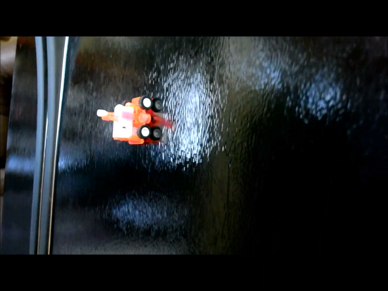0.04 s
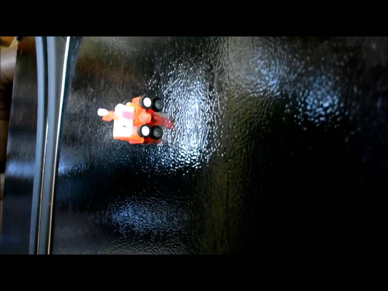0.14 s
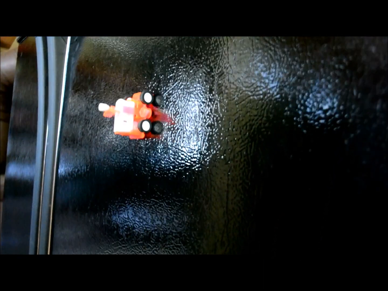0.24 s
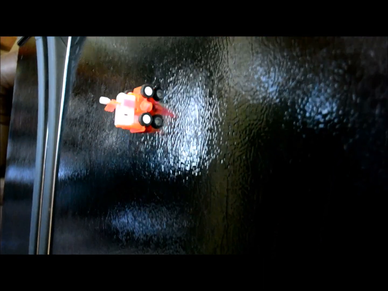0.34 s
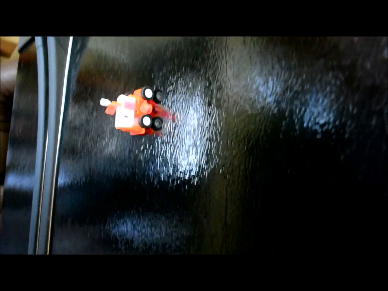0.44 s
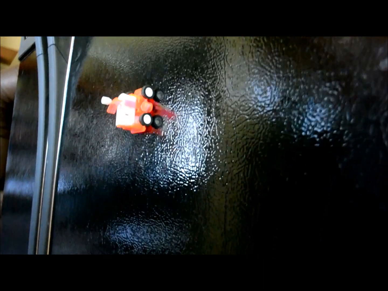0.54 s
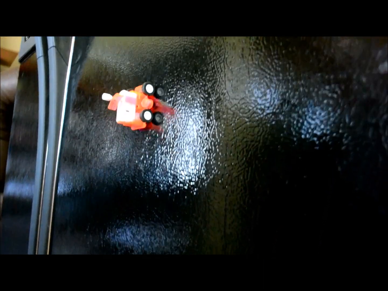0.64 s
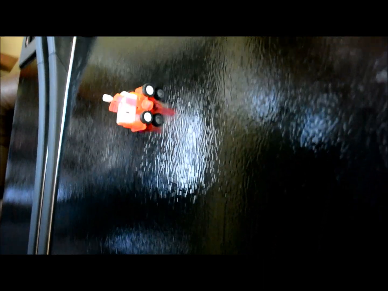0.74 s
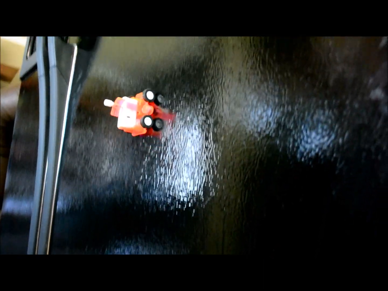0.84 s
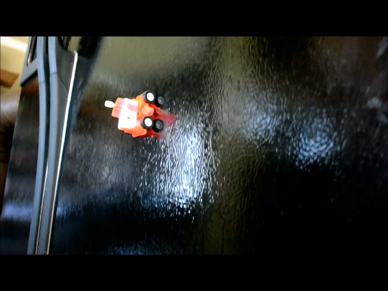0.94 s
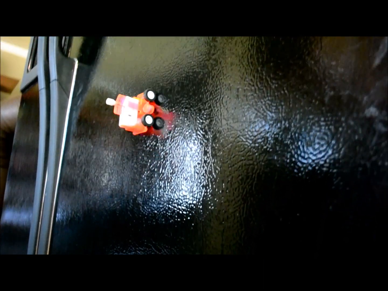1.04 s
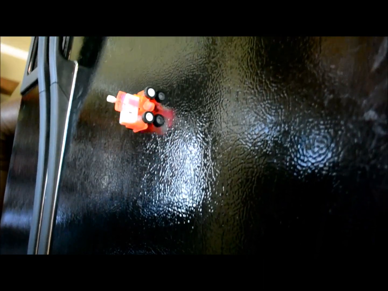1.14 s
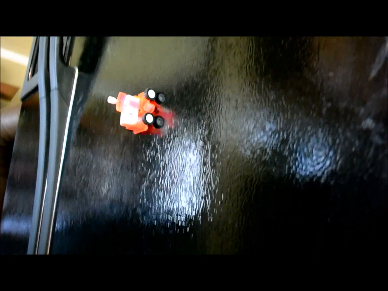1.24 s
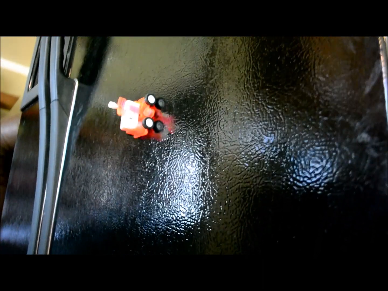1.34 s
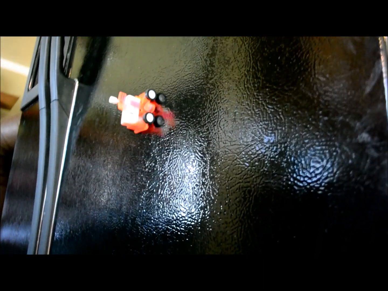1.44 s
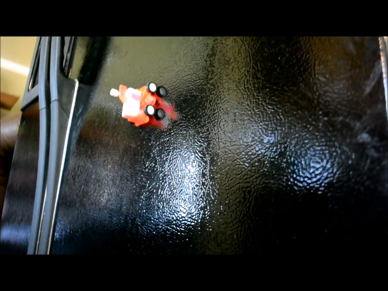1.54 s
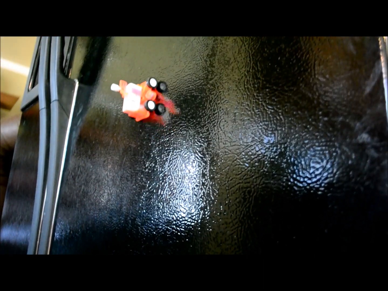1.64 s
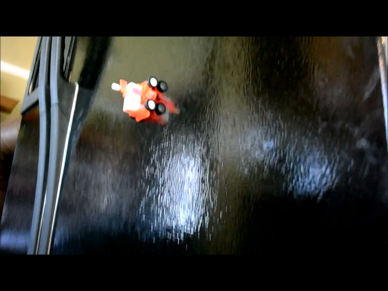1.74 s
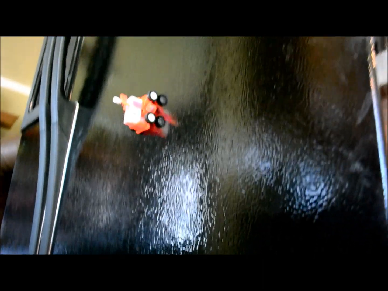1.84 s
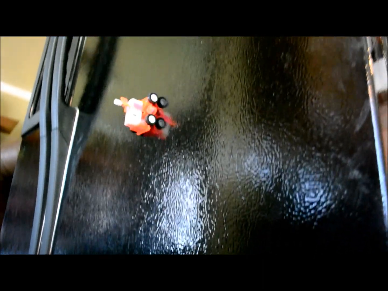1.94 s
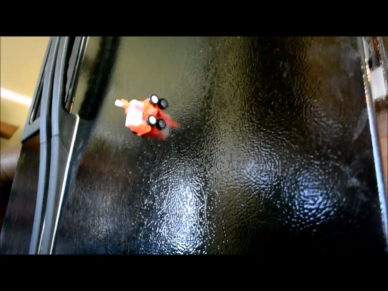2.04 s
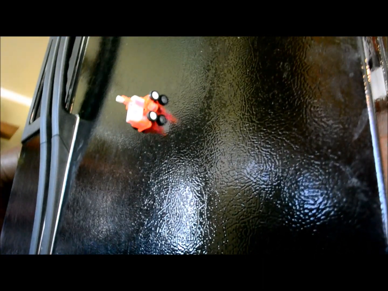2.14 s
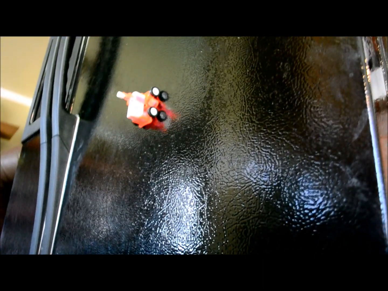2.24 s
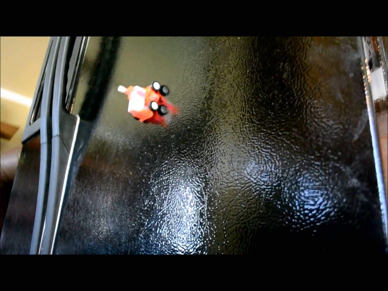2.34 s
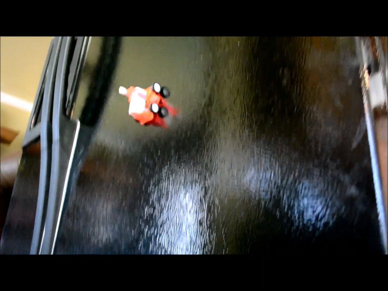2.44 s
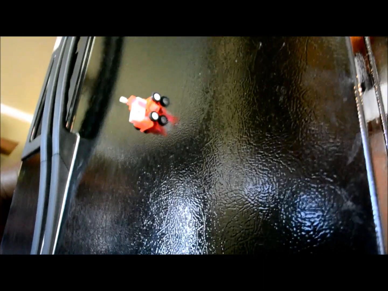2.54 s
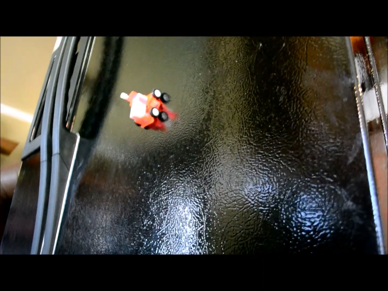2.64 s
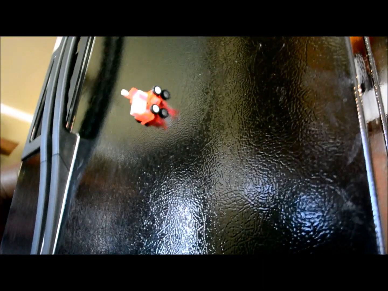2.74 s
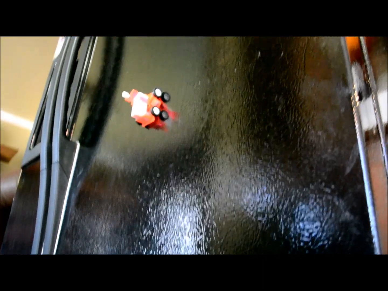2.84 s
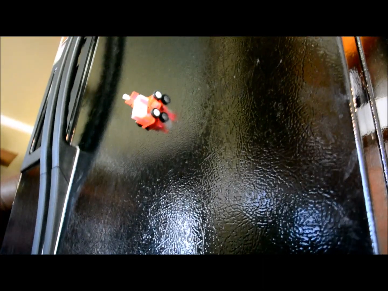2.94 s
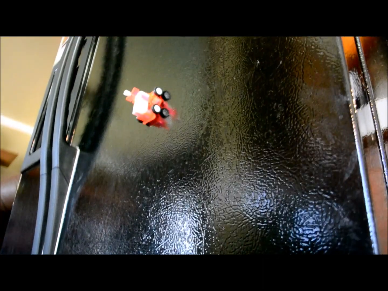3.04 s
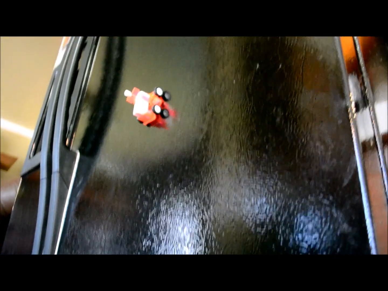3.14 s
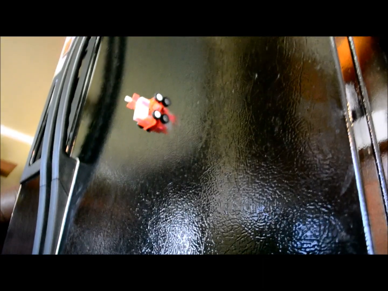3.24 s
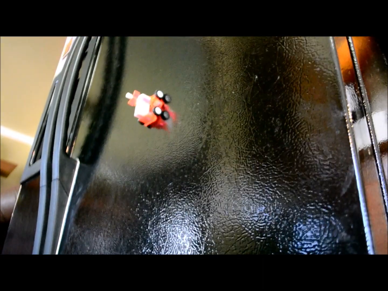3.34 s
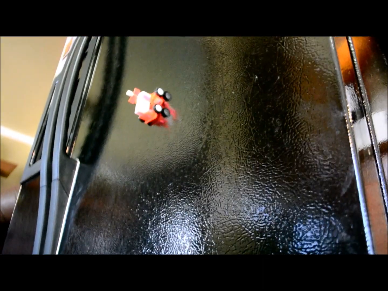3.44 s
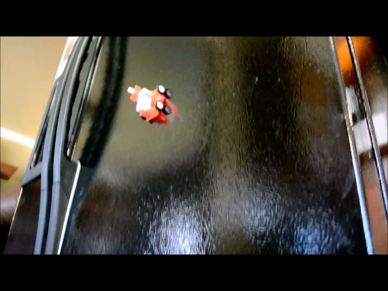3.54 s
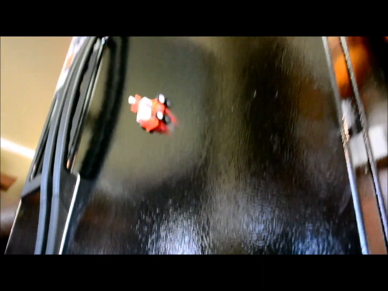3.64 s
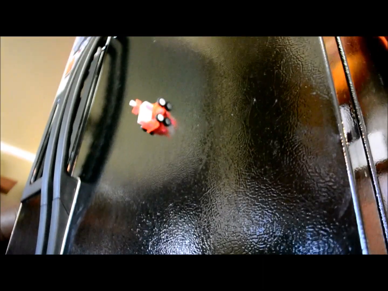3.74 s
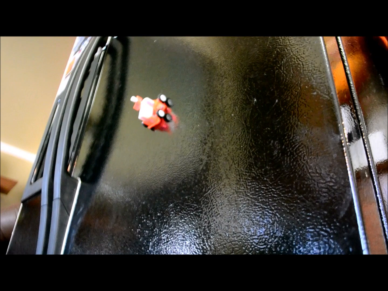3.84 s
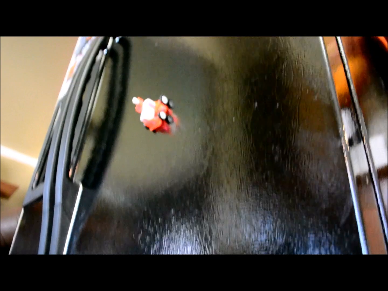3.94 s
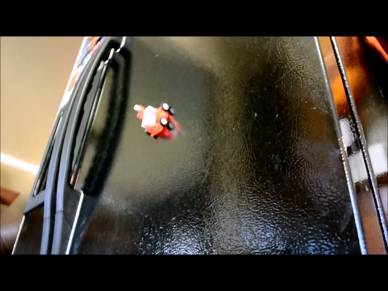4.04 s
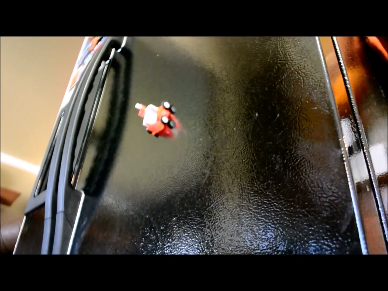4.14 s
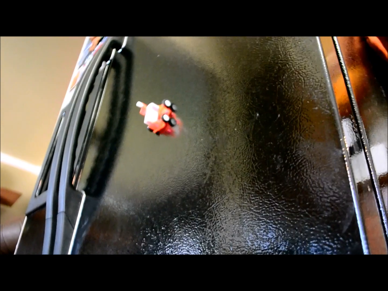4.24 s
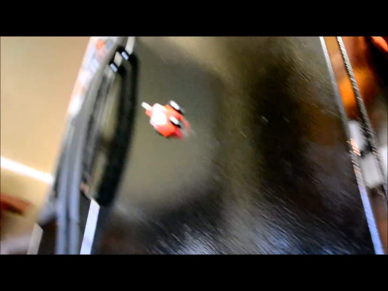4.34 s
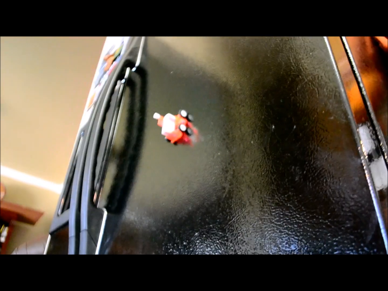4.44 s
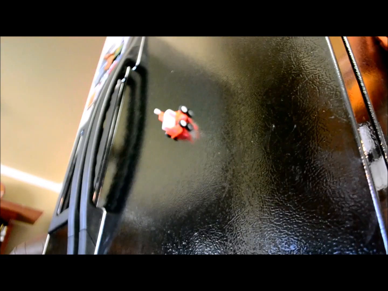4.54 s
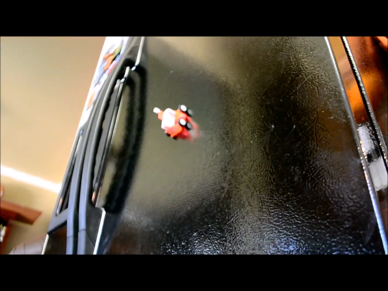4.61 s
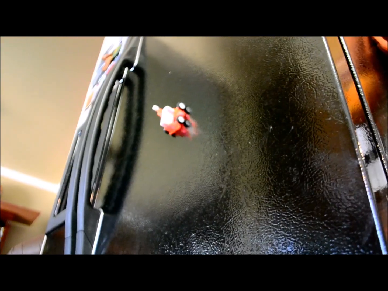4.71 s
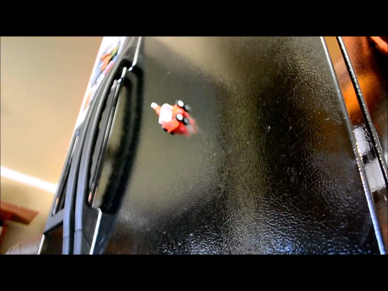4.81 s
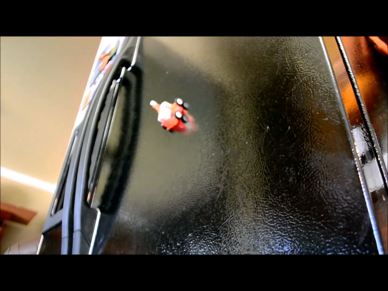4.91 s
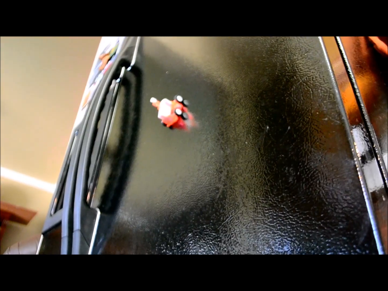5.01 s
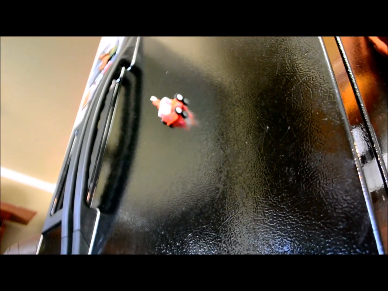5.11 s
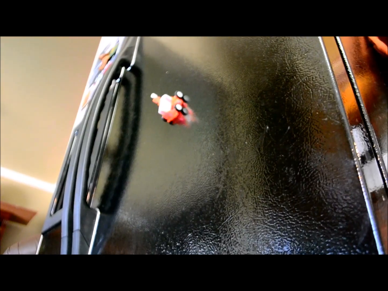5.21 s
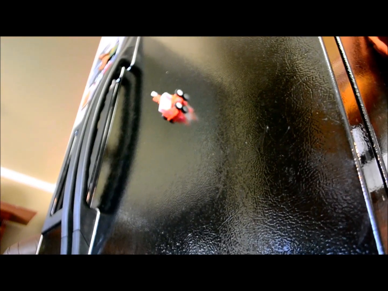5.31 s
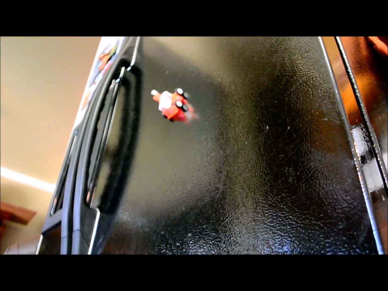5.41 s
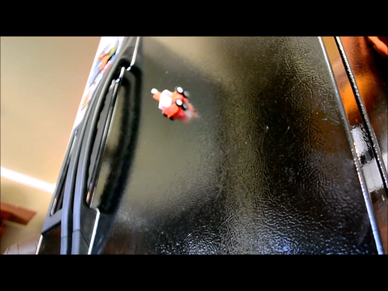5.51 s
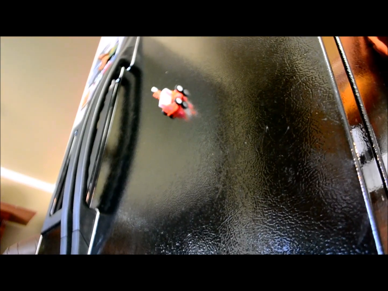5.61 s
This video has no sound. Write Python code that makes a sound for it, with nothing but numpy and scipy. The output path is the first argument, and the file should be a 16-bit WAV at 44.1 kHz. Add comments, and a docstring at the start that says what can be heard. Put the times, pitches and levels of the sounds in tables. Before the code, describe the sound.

Heard up close in a kitchen, a clockwork toy whirs with a high, plastic buzz of rapid ticks as it crawls up a metal fridge door. It starts steady, then drags briefly here and there, clicking as gear teeth catch and lightly tapping the door. The microphone takes a few soft, low bumps. As the spring unwinds, the buzz slows, weakens and stutters, still going over a faint fridge hum and hiss.

```python
"""A plastic wind-up toy climbs a steel fridge door, away from the microphone, as the fridge hums.
At first its spring drives about 110 tick-tocks a second, which ring the plastic shell and the door,
while gears rasp and loose parts rattle. From half a second on, the gears snag now and then.
Soon the toy gives its first knocks on the door, and the microphone is bumped a few times.
After four seconds the spring is running down: the ticks end slower, softer and more uneven."""
import sys
import numpy as np
from scipy import signal
from scipy.fft import rfft, irfft
from scipy.io import wavfile

SR = 44100
rng = np.random.default_rng(int(sys.argv[2]) if len(sys.argv) > 2 else 0)


def unload_audio(sound):
    """Save the sound as a 16-bit wav file, at the path given as the first command line argument."""
    columns = np.transpose(np.atleast_2d(sound))
    # keep every value between -1 and 1, then stretch to whole-number steps
    steps = np.round(np.clip(columns, -1, 1) * 32767)
    wavfile.write(sys.argv[1], SR, steps.astype(np.int16))


N = 250047
TIME = np.arange(N) / SR
FREQ = np.fft.rfftfreq(8192, 1 / SR)

# The pace of the unwinding spring, before snags: time_s, beat_rate_hz, relative_level_db
SPRING_PACE = [(0.0, 109.9, -22.5), (.25, 111.5, -21.5), (.35, 110.5, -22.5), (.41, 109.8, -22),
               (.46, 110, -22.5), (.55, 108.4, -22.8), (1.05, 110.3, -21), (1.7, 99.14, -21.5),
               (2.85, 97, -22.5), (3.65, 89.8, -23), (4.0, 75.7, -27), (4.55, 76.2, -27),
               (4.92, 75.46, -28), (5.03, 68.5, -28.5), (5.67, 62.4, -31)]
# Moments when the gears drag: start_s, length_s, slower_by_hz, softer_by_db
GEAR_SNAGS = [(0.561, 0.33, 9.6, -0.3), (1.262, .31, 15, 0.5), (2.047, 0.088, 11.6, 2.8),
              (2.366, 0.36, 8.2, 1.1), (3.042, 0.43, 13.7, 2.8), (3.447, 0.057, 3.13, 4),
              (3.808, 0.057, 4.2, 1.5), (4.066, .125, 9.1, 7), (4.14, .04, 2, 5), (4.243, 0.046, 5.4, 11),
              (4.538, 0.045, 2.74, 6), (4.675, 0.031, 3.5, 4), (5.05, 0.087, 2.77, 11),
              (5.418, 0.15, 3, 10), (5.435, .035, 2, 10)]
# Teeth that catch hard: time_s, relative_level_db
HARD_CATCHES = [(1.7979, -15), (2.3604, -21.5), (2.4202, -19), (2.5474, -20.5), (2.6853, -20),
                (2.696, -19.5), (2.765, -19.5), (2.7904, -19), (2.8195, -19.5), (2.8503, -20),
                (2.9549, -20.5), (3.021, -22.5), (3.0686, -22.5), (3.098, -22), (3.138, -22.5),
                (3.1833, -23), (3.2345, -21.5), (3.3325, -23), (3.4263, -22), (3.5211, -22.5),
                (3.5545, -21), (3.6004, -21), (3.6323, -20), (3.6426, -19.5), (3.757, -22), (3.7805, -21),
                (3.8049, -23), (3.8693, -24), (3.983, -23.5), (4.047, -22), (4.2203, -23), (4.291, -25.5),
                (4.32, -22), (4.4043, -21), (4.616, -23.5), (4.6538, -25), (4.7385, -25), (4.7497, -26),
                (4.7765, -27), (4.8166, -26), (4.8865, -24.5), (4.899, -26), (4.9236, -24.5),
                (4.9378, -27.5), (4.952, -25), (5.0965, -28.5), (5.1595, -26.5), (5.2025, -28.5),
                (5.2302, -20.5), (5.241, -27), (5.318, -28), (5.351, -27), (5.3814, -28.5), (5.3943, -29),
                (5.4074, -26), (5.526, -36), (5.58, -34), (5.6, -29), (5.6326, -26.5), (5.6487, -27)]
# Pitches at which the plastic shell rings: pitch_hz, width_hz, from_side_db, from_behind_db
SHELL_RESONANCES = [(2450, 530, -10, -49), (2916, 300, -4, -11), (3643, 745, -2, -6), (4133, 324, 4, -5),
                    (4480, 420, -1, -3), (4880, 450, -2, -14), (5490, 1100, 0, -7.5), (6020, 790, -10.5, 0),
                    (6740, 1000, -9, -6), (7550, 1170, -15.5, -5), (8390, 810, -8, -6),
                    (9390, 1520, -7.5, -9.5), (10370, 960, -6, -19.5)]
# Shell pitches that stand out for a while: start_s, end_s, from_hz, to_hz, width_hz, added_band_db
PASSING_RINGS = [(0.15, 0.5, 3550, 3600, 600, -3), (0.0, 0.55, 4290, 4150, 300, -8),
                 (0.5, 1.2, 4140, 4080, 240, -13), (0.33, 0.7, 5480, 5560, 500, -10),
                 (1.65, 2.9, 4230, 4280, 260, -3), (2.38, 3.1, 4530, 4500, 190, -1.5),
                 (1.6, 3.05, 6780, 6680, 380, -9), (2.75, 4.1, 3650, 3330, 480, -2),
                 (4.6, 5.45, 7420, 7380, 260, -4), (4.75, 5.45, 5600, 5550, 380, -7)]
# Pitches at which the steel door rings: pitch_hz, width_hz, from_side_db, from_behind_db
DOOR_RESONANCES = [(202.5, 46, 5, -34), (299.4, 36, 8, 3), (438, 74, -4, -2.5), (744, 710, -6, -13),
                   (997, 93, -7, 5.5), (1088, 83, -24, 5), (1325, 280, -6, 3), (1610, 710, 6, -3)]
# How the climbing toy faces the microphone: time_s, behind_share (0 = side on, 1 = from behind)
VIEWPOINT = [(0.0, 0.1), (2.9, 0.6), (4.1, 0.77), (5.67, 1.0)]
# The toy's knocks and rebounds on the door: start_s, level_db, pitch_hz, decay_s
DOOR_KNOCKS = [(0.9185, -39, 1240, .01), (0.921, -31.5, 1240, .016), (1.2738, -37, 1180, .024),
               (1.2787, -38, 1200, .016), (4.0765, -36, 1600, .007), (4.0765, -44, 410, .018),
               (4.3635, -33, 520, .007), (4.367, -41, 280, .016), (5.605, -35, 1400, .012),
               (5.614, -41, 1400, .012)]
# First echoes off the kitchen fittings: delay_s, starting_level_db
KITCHEN_ECHOES = [(.0027, -16), (.0062, 1)]
# Handling bumps on the microphone: start_s, level_db, pitch_hz, width_hz, decay_s
MICROPHONE_BUMPS = [(1.21, -71, 34.93, 39.82, 0.19), (1.62, -67, 88.7, 69.8, 0.16),
                    (1.92, -61, 110.6, 45.3, 0.25), (2.205, -56, 100.1, 51.1, 0.2),
                    (2.228, -47, 140.8, 113, 0.07), (3.195, -57.5, 69.4, 35.7, 0.21),
                    (3.585, -68, 99, 50, 0.21), (4.364, -56, 130.2, 119.5, 0.028)]
# Tones of the fridge's compressor: pitch_hz, relative_level_db
HUM_TONES = [(59, -82), (120, -71), (192, -71), (780, -76), (840, -71), (1140, -71), (1200, -71),
             (1320, -73), (1560, -75), (1920, -80), (1980, -82), (2040, -80), (2280, -79), (2340, -79),
             (2400, -76), (2460, -79), (2580, -83)]
# The tone colour of the kitchen air: pitch_hz, relative_level_db
AIR_COLOUR = [(25, -31), (60, -23), (150, -23.5), (210, -13), (340, -8), (620, -15), (1100, -11),
              (1750, -14), (2150, -20.5), (3200, -15), (4000, -11), (5000, -16), (6200, -13), (9000, -29),
              (11500, -48)]


def spring_motor(grip_s=.02, eased_share=.7, let_go_s=.03):
    """Beat rate and tick level sink with the spring; each snag grips, eases a little, then lets go."""
    rate, force_db = curves(SPRING_PACE)
    for start_s, length_s, slower_hz, softer_db in GEAR_SNAGS:
        stages_s = np.cumsum([0, grip_s, max(length_s - grip_s, 0), let_go_s])
        drag = np.interp(TIME - start_s, stages_s, [0, 1, eased_share, 0])
        rate, force_db = rate - slower_hz * drag, force_db - softer_db * drag
    return rate, force_db


def beats(rate, force_db, wobble=.036, full_pace_hz=109, wheel_teeth=10, wheel_db=.5):
    """A toothed wheel slips on one tooth at a time, which sets the time and level of each tick."""
    progress = np.cumsum(rate * (1 + wobble * wander(70))) / SR  # counted in teeth
    # A whole number of teeth passes between two hard catches.
    catch_s, catch_db = np.transpose(HARD_CATCHES)
    marks = np.r_[0, np.interp(catch_s, TIME, progress), progress[-1]]
    teeth_between = np.maximum(1, np.round(np.diff(marks)))
    tooth_at_mark = np.r_[0, np.cumsum(teeth_between)].astype(int)
    tooth = np.arange(tooth_at_mark[-1])
    times = np.interp(np.interp(tooth, tooth_at_mark, marks), progress, TIME)
    # The slower the beat, the more uneven the ticks.
    octaves_slower = np.log2(full_pace_hz / np.interp(times, TIME, rate))
    scatter_db = (.92 + 1.3 * octaves_slower) * np.sqrt(3) * rng.uniform(-1, 1, N)[tooth]
    # The wheel is slightly off centre, so the ticks swell once a turn.
    swell_db = wheel_db * np.sin(2 * np.pi * tooth / wheel_teeth)
    tick_db = np.interp(times, TIME, force_db) + swell_db + scatter_db
    tick_db[tooth_at_mark[1:-1]] = catch_db
    return times, tick_db


def tick_tock(times, tick_db, force_db, bounce_s=.00047, tock_db=-3.5):
    """Each tooth slides onto a rocking catch, strikes and bounces; the catch's other side then tocks."""
    chance = rng.standard_normal((1024, 5))[:len(times)].T
    slide_scatter_db, bounce_jitter, bounce_scatter_db, tock_jitter, tock_scatter_db = chance
    # As the spring slackens, strike and slide gain on the bounce (slopes in dB per second).
    hardness_db = -3.5 + .15 * times
    slide_db = -3 + .37 * times
    bounce_db = -5.5 - 1.0 * times
    # The body of the strike is even; how hard a tooth catches changes only its bright edge.
    strike = impacts(times, np.interp(times, TIME, force_db) + hardness_db)
    edge = impacts(times, tick_db + hardness_db) - strike
    slide = impacts(times, tick_db + slide_db + slide_scatter_db)
    bounce_times = times + bounce_s * np.exp(.3 * bounce_jitter)
    bounce = impacts(bounce_times, tick_db + bounce_db + bounce_scatter_db)
    # The tock falls about halfway between two ticks, a little later as the spring slackens.
    gap_share = .475 + .017 * times + .08 * tock_jitter
    tock = impacts(times + np.gradient(times) * gap_share, tick_db + tock_db + tock_scatter_db)
    scrape = smear(slide + tock, decay_s=.0011, rise_s=.001)
    return strike + treble(edge + bounce + scrape)


def gears(rate, force_db, rasp_db=-40, grain_db=5):
    """Gear teeth slide over each other in a fine, grainy rasp."""
    grains = rng.standard_normal(N) * gain(grain_db * rng.standard_normal(N))
    return grains / grains.std() * gain(force_db + rasp_db) * np.sqrt(rate / rate.mean())


def rattle(rate, force_db, per_beat=3, rattle_db=-10.5, fade_db_per_s=-.6, uneven_db=3):
    """Loose plastic parts chatter at random, more softly as the spring slackens."""
    times = TIME[rng.random(N) < per_beat * rate / SR]
    scatter_db = uneven_db * rng.uniform(-1, 1, N)[:len(times)]
    level_db = np.interp(times, TIME, force_db) + rattle_db + fade_db_per_s * times + scatter_db
    return treble(impacts(times, level_db), edge_hz=3200)


def shell(blows, fade_s=.04):
    """The plastic shell rings; a few narrow bands stand out for a while, glide and fade."""
    ringing = ring_while_climbing(bending_waves(blows), SHELL_RESONANCES)
    out = ringing
    for start_s, end_s, from_hz, to_hz, width_hz, added_db in PASSING_RINGS:
        pitch_hz = np.interp(TIME, [start_s, end_s], [from_hz, to_hz])
        # Pick out a moving band: shift it down to 0 Hz, smooth it, shift it back.
        shift = np.exp(2j * np.pi * np.cumsum(pitch_hz) / SR)
        smoothing = np.exp(-np.pi * width_hz / SR)
        band = 2 * np.real(shift * signal.lfilter([1 - smoothing], [1, -smoothing], ringing / shift))
        fade = np.clip(.5 + np.minimum(TIME - start_s, end_s - TIME) / fade_s, 0, 1)
        out = out + gain(added_db) * fade * band
    return out


def bending_waves(blows, spread_s=.0008, on_time_hz=6000):
    """High pitches cross the shell faster than low ones, so each tick becomes a tiny falling chirp."""
    hz = np.fft.rfftfreq(N, 1 / SR)
    lag_cycles = spread_s * (2 * np.sqrt(on_time_hz * hz) - hz)
    return irfft(rfft(blows) * np.exp(-2j * np.pi * lag_cycles), N)


def door(blows, force_db, door_db=-12.5, push_db=-25, follow_share=.78):
    """The wheels pass the shaking to the steel door, which smears it into a soft drone."""
    # Magnets keep the wheels pressed on, so the door fades less than the shell.
    contact = gain((1 - follow_share) * (push_db - force_db))
    shaking = smear(blows * contact, decay_s=.056)
    return gain(door_db) * ring_while_climbing(shaking, DOOR_RESONANCES)


def knocks(rise_s=.0004):
    """The toy raps the door and may rebound: each rap rings briefly at one pitch."""
    out = np.zeros(N)
    for start_s, level_db, pitch_hz, decay_s in DOOR_KNOCKS:
        age_s = np.clip(TIME - start_s, 0, 2 * decay_s)
        out += gain(level_db) * np.sin(2 * np.pi * pitch_hz * age_s) * rise_fall(age_s, rise_s, decay_s)
    return out


def room(blows, sway=.0301, fade_db_per_s=-3.5, near_db=-3, tail_db=-7.5):
    """Sound bounces off the door, returns as two drifting, fading echoes, then lingers in the kitchen."""
    delayed, echoes = [], 0
    for delay_s, level_db in KITCHEN_ECHOES:
        delayed.append(np.interp(TIME - delay_s * (1 + sway * wander(3)), TIME, blows))
        echoes = echoes + gain(level_db + fade_db_per_s * TIME) * delayed[-1]
    off_door = gain(near_db) * smear(blows, decay_s=.0041)
    tail = gain(tail_db) * treble(smear(delayed[0], decay_s=.32), edge_hz=3700)
    return treble(echoes + off_door) + tail


def bumps(rise_s=.016):
    """Handling bumps the microphone: each soft blow is a short, low rumble."""
    out = np.zeros(N + SR)
    age_s = TIME[:SR // 2]
    for start_s, level_db, pitch_hz, width_hz, decay_s in MICROPHONE_BUMPS:
        rumble = through(rng.standard_normal(len(age_s)), resonator([(pitch_hz, width_hz, 0)]))
        thud = unit_energy(rumble * rise_fall(age_s, rise_s, decay_s))
        start = int(start_s * SR)
        out[start:start + len(thud)] += gain(level_db) * thud * np.sqrt(decay_s * SR / np.log(1000))
    return out[:N]


def fridge_hum(trim_db=-.5, waver_db=.9):
    """The compressor hums on fixed pitches, each wavering in level."""
    hum = np.zeros(N)
    for pitch_hz, level_db in HUM_TONES:
        strength = np.sqrt(2) * gain(level_db + trim_db + waver_db * wander(3.21))
        hum += strength * np.sin(2 * np.pi * (pitch_hz * TIME + rng.random()))
    return hum


def kitchen_air(air_db=-53.5):
    """The air in the kitchen is a soft, steady hiss."""
    pitch_hz, level_db = np.transpose(AIR_COLOUR)
    colour = gain(np.interp(np.log(FREQ + 1), np.log(pitch_hz), level_db))
    return gain(air_db) * through(rng.standard_normal(N), tap_response(colour))


def ring_while_climbing(blows, resonances):
    """Ring an object whose tone shifts as the toy is heard more and more from behind."""
    behind = np.clip(curves(VIEWPOINT)[0], 0, 1)
    side = resonator([(hz, width, side_db) for hz, width, side_db, _ in resonances])
    rear = resonator([(hz, width, rear_db) for hz, width, _, rear_db in resonances])
    return through(blows * (1 - behind), side) + through(blows * behind, rear)


def resonator(resonances):
    """The sound of one tap on an object that rings at rows of pitch_hz, width_hz, level_db."""
    peaks = (gain(db) / (1 + ((FREQ - hz) / (.5 * width)) ** 2) for hz, width, db in resonances)
    return tap_response(np.sqrt(sum(peak ** 2 for peak in peaks)))


def tap_response(colour):
    """Turn a gain for each pitch in FREQ into a ring that starts at the tap and dies away."""
    cepstrum = irfft(np.log(colour + 1e-4 * colour.max()))
    half = len(cepstrum) // 2
    # Folding the second half onto the first keeps any sound from coming before the tap.
    folded = np.r_[cepstrum[0], 2 * cepstrum[1:half], np.zeros(half)]
    return unit_energy(irfft(np.exp(rfft(folded)))[:half])


def smear(blows, decay_s, rise_s=1 / SR):
    """Countless tiny arrivals: noise swells just before each blow, then falls 60 dB in decay_s."""
    age_s = np.arange(-SR // 4, SR // 4 + 1) / SR
    hump = np.exp(np.where(age_s < 0, age_s / rise_s, -np.log(1e6) * age_s / decay_s))
    power = signal.fftconvolve(blows ** 2, hump / hump.sum(), "same")
    return np.sqrt(np.abs(power)) * rng.standard_normal(N)


def impacts(times, level_db):
    """A row of sharp blows, one sample each."""
    at = np.round(times * SR).astype(int)
    inside = (at >= 0) & (at < N)
    return np.bincount(at[inside], gain(level_db)[inside], N)


def rise_fall(age_s, rise_s, decay_s):
    """A quick swell times a fade of 60 dB in decay_s."""
    return (1 - np.exp(-age_s / rise_s)) * np.exp(-np.log(1000) * age_s / decay_s)


def treble(sound, edge_hz=4500):
    """Keep the high pitches, where rubbing and scattered sound mostly lie."""
    return signal.sosfiltfilt(signal.butter(3, edge_hz, "high", fs=SR, output="sos"), sound)


def through(sound, response):
    """Make every sample of a sound set off the given tap response."""
    return signal.fftconvolve(sound, response)[:len(sound)]


def wander(rate_hz):
    """A random drift, roughly between -1 and 1."""
    return np.interp(TIME * rate_hz, np.arange(N), rng.standard_normal(N))


def curves(table):
    """Each column of a table over time, joined by straight lines."""
    time_s, *columns = np.transpose(table)
    return [np.interp(TIME, time_s, column) for column in columns]


def unit_energy(sound):
    """Scale a sound so its squared samples add up to 1."""
    return sound / np.sqrt(np.sum(sound ** 2))


def gain(db):
    """Turn decibels into a multiplier."""
    return 10 ** (np.asarray(db) / 20)


def scene(toy_db=6):
    """The motor shakes shell and door; knocks, bumps, hum and air lie around it."""
    rate, force_db = spring_motor()
    times, tick_db = beats(rate, force_db)
    ticks = tick_tock(times, tick_db, force_db)
    blows = gain(toy_db) * (ticks + gears(rate, force_db) + rattle(rate, force_db))
    toy = shell(blows + treble(room(blows))) + door(blows, force_db)
    return (toy + knocks() + bumps() + fridge_hum() + kitchen_air())[None]


def record(dry, low_hz=45, notch_hz=7900, notch_width_hz=260, notch_share=.47, top_hz=11300):
    """The microphone thins the deep bass, dips one treble band, softens the top, then cuts it steeply."""
    thinned = signal.sosfilt(signal.butter(2, low_hz, "high", fs=SR, output="sos"), dry)
    band = signal.lfilter(*signal.iirpeak(notch_hz, notch_hz / notch_width_hz, fs=SR), thinned)
    softened = signal.sosfilt(signal.butter(6, 10800, fs=SR, output="sos"), thinned - notch_share * band)
    return signal.sosfilt(signal.ellip(8, .3, 70, top_hz, fs=SR, output="sos"), softened)


dry = scene()
out = record(dry)
unload_audio(out)
```